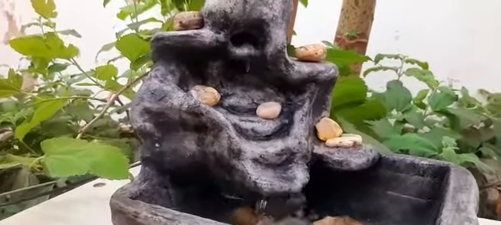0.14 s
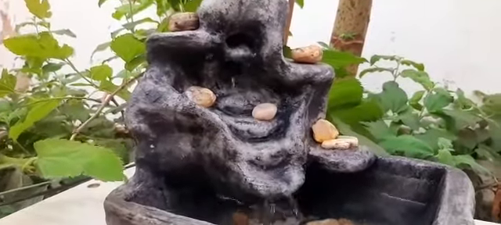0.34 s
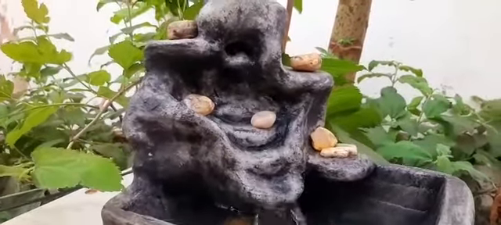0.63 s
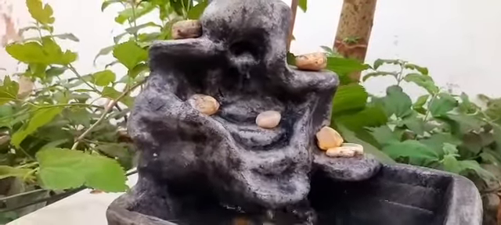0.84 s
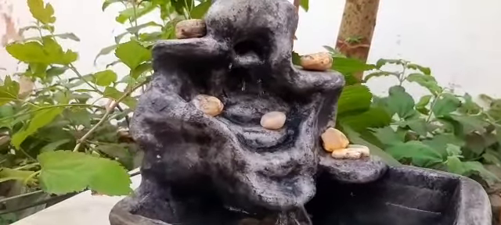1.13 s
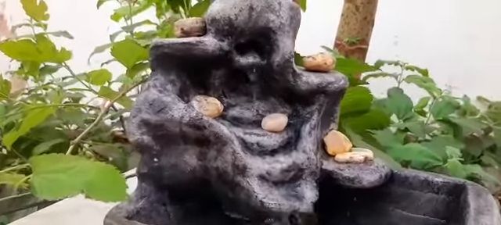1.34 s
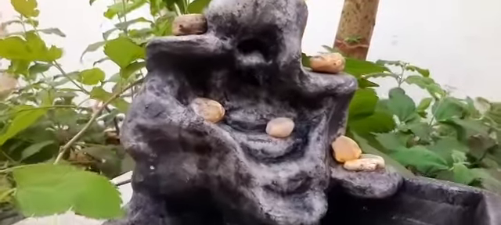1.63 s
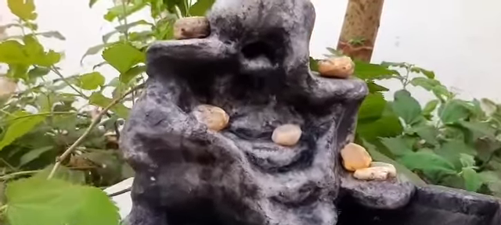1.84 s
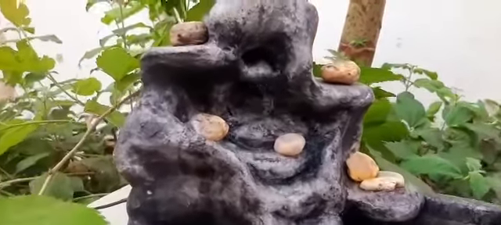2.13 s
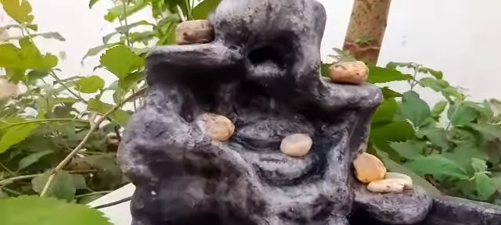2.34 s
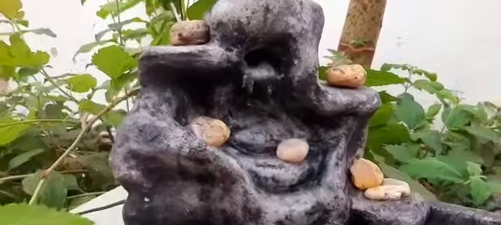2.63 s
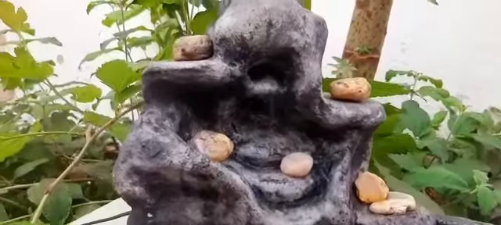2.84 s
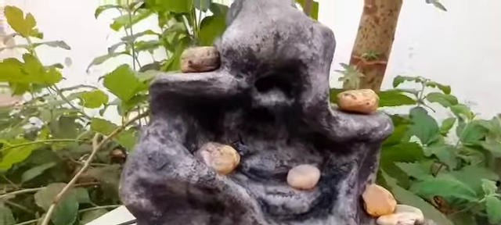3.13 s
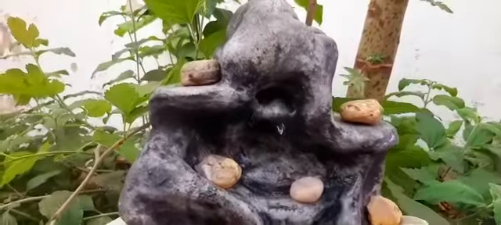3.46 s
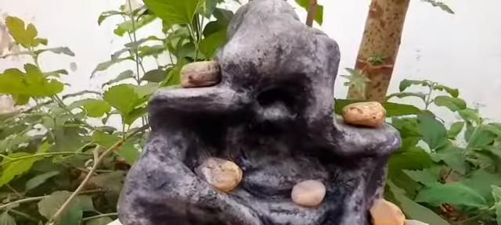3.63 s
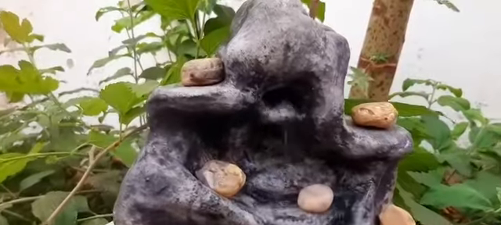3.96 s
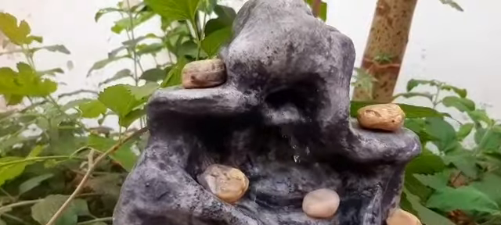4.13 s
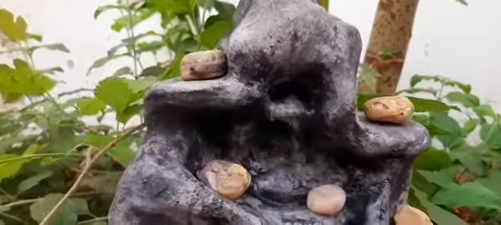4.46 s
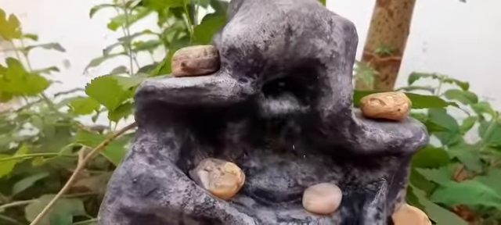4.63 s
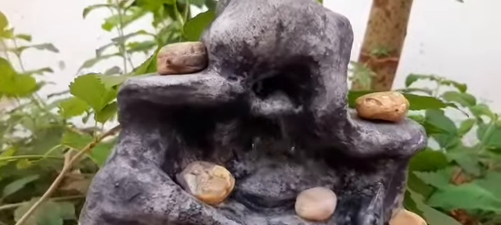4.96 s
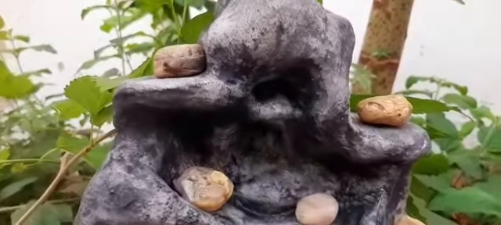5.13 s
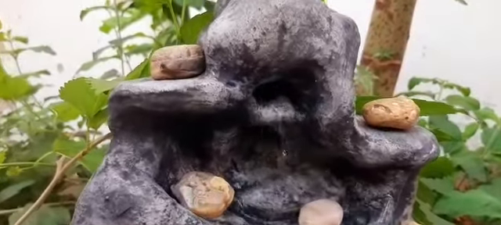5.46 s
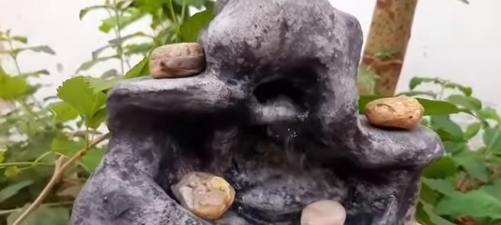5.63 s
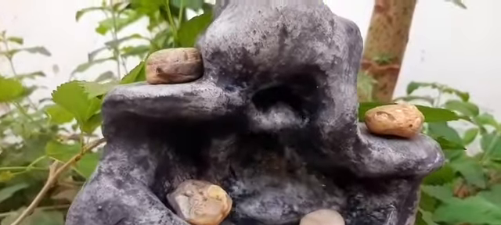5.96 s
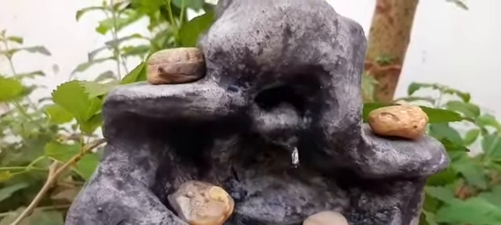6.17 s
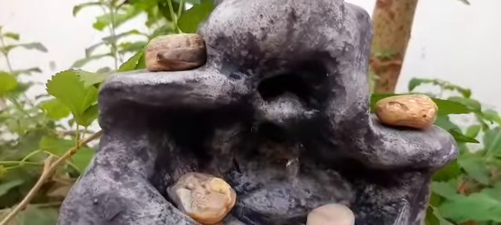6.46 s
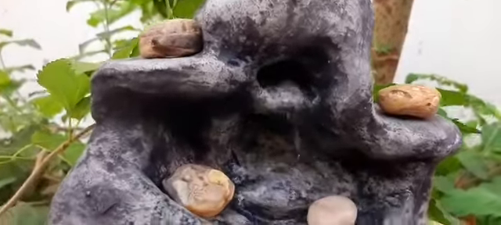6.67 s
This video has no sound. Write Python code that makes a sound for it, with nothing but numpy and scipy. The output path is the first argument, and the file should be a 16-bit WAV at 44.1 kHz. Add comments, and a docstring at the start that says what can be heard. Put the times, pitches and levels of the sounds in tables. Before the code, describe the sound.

Outdoors in a garden corner, a tiny fountain drips steadily but unevenly, each drop a short slap or a quick ringing blip, with faint spray between. Low road rumble and soft tyre roar bump up early, dip, then return. A faint narrow whine fades before three seconds, and motor hum pulses later. Close stereo microphone, bright water at right, shaded dull left, slight hiss and a short dry reflection.

```python
"""Traffic rumble, tyre roar and a fine trickle open the scene, and at once drops tick and ring in a garden corner.
A small stone fountain drips from tier to tier: noise puffs are the slaps, damped sines the trapped bubbles.
Behind it an engine slows to idle and a second motor's hum swells and fades, both stacks of wavering sines;
a narrow whine and a brief rustle are shaped noise, as are the rumble, roar and trickle.
The right microphone port faces the water; the left one is shaded and hears mostly bass."""
import sys
import numpy as np
from scipy import signal
from scipy.fft import rfft, irfft
from scipy.io import wavfile

SR = 44100
rng = np.random.default_rng(int(sys.argv[2]) if len(sys.argv) > 2 else 0)


def master_out(mix):
    """Clip the mix to full scale and print it as 16-bit PCM to the path in sys.argv[1]."""
    frames = np.transpose(np.atleast_2d(mix))
    ceiling = np.clip(frames, -1, 1)
    pcm = np.round(ceiling * 32767).astype(np.int16)
    wavfile.write(sys.argv[1], SR, pcm)


N = 299880
TIME = np.arange(N) / SR

# bubbles trapped by drops: (time [s], level [dB], settled pitch [Hz])
DROP_BUBBLES = [(0.0291, -42, 6250), (0.029, -43.5, 2100), (0.111, -36, 5800), (0.139, -40.5, 6300),
                (0.1867, -35.5, 5340), (0.189, -33, 3410), (0.2973, -40, 6380), (0.3458, -36, 1886),
                (0.3879, -38.5, 5600), (0.4015, -34, 3860), (0.417, -43.5, 6400), (0.517, -39, 6100),
                (0.562, -34, 5150), (0.7416, -40, 5580), (0.8015, -34, 1463), (0.805, -36.5, 4100),
                (1.0013, -38.5, 3860), (1.011, -40.5, 5250), (1.07, -32.5, 1755), (1.153, -40, 4000),
                (1.181, -36.5, 4150), (1.2438, -35.5, 2710), (1.5, -35, 6500), (1.618, -33, 3270),
                (1.686, -44, 2040), (1.7385, -31, 2640), (1.7413, -35.5, 3680), (1.768, -37, 5660),
                (1.803, -40.5, 6300), (1.8678, -43, 6000), (1.9649, -36, 6210), (2.1064, -39.5, 3280),
                (2.176, -28.5, 2970), (2.1765, -42.5, 6360), (2.219, -32, 3970), (2.256, -38.5, 2800),
                (2.3021, -28, 3200), (2.318, -47, 3600), (2.3925, -39, 7260), (2.4266, -30, 5500),
                (2.449, -42, 6440), (2.4918, -39, 1860), (2.5323, -44.5, 6600), (2.658, -44.5, 3180),
                (2.666, -45.5, 5660), (2.693, -47, 2430), (2.7284, -39, 3110), (2.792, -42, 6140),
                (2.8884, -38.5, 6470), (2.926, -44, 6200), (2.993, -45, 6350), (2.9913, -40, 4470),
                (3.0183, -33.5, 5660), (3.048, -43.5, 2860), (3.1808, -34, 1727), (3.2138, -40.5, 6800),
                (3.2132, -39, 5200), (3.239, -41, 2470), (3.503, -39, 3660), (3.5466, -32, 4440),
                (3.5505, -37, 3800), (3.549, -36.5, 6330), (3.6082, -29.5, 1703), (3.739, -37, 1576),
                (3.771, -35.5, 4340), (3.817, -44, 6700), (3.8358, -33, 6120), (3.849, -34, 2920),
                (3.869, -41.5, 2070), (3.999, -41, 3160), (4.014, -35.5, 6170), (4.04, -36, 5930),
                (4.17, -32.5, 1354), (4.218, -46, 3320), (4.2685, -36.5, 1535), (4.3724, -32.5, 5140),
                (4.5028, -35, 1522), (4.553, -40.5, 5300), (4.6156, -38.5, 5326), (4.632, -42, 4360),
                (4.67, -43.5, 2380), (4.8036, -40, 6280), (4.8161, -29.5, 1600), (4.8662, -37, 5750),
                (4.911, -37.5, 4430), (4.9474, -36, 3470), (4.947, -39, 1685), (4.962, -39, 5550),
                (4.974, -30.5, 4300), (5.063, -39.5, 6100), (5.0704, -42, 6400), (5.113, -45, 3540),
                (5.222, -46.5, 3200), (5.273, -35, 6210), (5.349, -42, 4540), (5.417, -35.5, 3150),
                (5.4173, -33, 6160), (5.483, -41, 5020), (5.544, -42, 6410), (5.555, -30, 5770),
                (5.555, -33.5, 7000), (5.574, -35.5, 1626), (5.596, -41.5, 5700), (5.649, -31, 4500),
                (5.647, -40.5, 6300), (5.689, -22, 2177), (5.771, -42.5, 3610), (5.7854, -38.5, 1630),
                (5.836, -35, 5850), (5.8473, -33.5, 3900), (5.872, -41, 6950), (5.882, -36, 1380),
                (5.9028, -32, 6180), (6.034, -43, 5900), (6.0405, -34.5, 5400), (6.252, -43.5, 2434),
                (6.265, -46, 6220), (6.3103, -34, 2600), (6.315, -29.5, 6780), (6.3295, -42, 6340),
                (6.474, -33, 2030), (6.485, -39, 7060), (6.556, -39.5, 4140), (6.602, -32.5, 2240),
                (6.614, -32.5, 5440), (6.6848, -30, 3620), (6.7253, -35, 3600), (6.725, -38.5, 6800),
                (6.7248, -27.5, 5270), (6.7654, -28.5, 3300), (6.783, -33, 2860), (6.7814, -32.5, 6480)]
# shading of far sound, left over right: (frequency [Hz], ratio [dB])
FAR_SHADE = [(30, -7), (90, 6.5), (450, -3.5), (900, -12), (2500, -27)]
# shading of the near water, left over right: (frequency [Hz], ratio [dB])
NEAR_SHADE = [(1900, -15), (2600, -21), (4300, -23), (5300, -38), (8000, -38), (11000, -32)]


def amp(db):
    """Turn dB into gain."""
    return 10 ** (np.asarray(db) / 20)


def rms_one(x):
    """Scale to rms 1."""
    return x / np.sqrt(np.mean(x ** 2) + 1e-20)


def in_time(rows):
    """Draw the columns of a time curve at every sample."""
    s, *columns = np.transpose(rows)
    return [np.interp(TIME, s, column) for column in columns]


def at_hz(points, hz):
    """Read a spectrum on a log frequency axis."""
    points = np.array(points)
    return np.interp(np.log(hz + 1), np.log(points[:, 0]), points[:, 1])


def colour(x, gain):
    """Filter by a gain given as a function of Hz."""
    return irfft(rfft(x) * gain(np.arange(N // 2 + 1) * SR / N), N)


def drift(rate):
    """Slow random wander of rms 1: noise through two equal poles at rate [Hz]."""
    step = 40   # samples between drawn points
    pole = np.exp(-2 * np.pi * rate * step / SR)
    noise = rng.standard_normal(N // step + 2002)
    slow = signal.lfilter([1], [1, -2 * pole, pole * pole], noise)[2000:]   # skip the run-in
    return np.interp(np.arange(N) / step, np.arange(len(slow)), rms_one(slow))


def sided(hz, side, shade=FAR_SHADE):
    """Response of one port (0 left and shaded, 1 right); the two average near 1."""
    turn_rad, turn_hz = 0.77, 398   # the shaded port's bass trails in phase, mostly below this pitch
    ratio = amp(at_hz(shade, hz))
    turn = np.exp(-1j * turn_rad * np.exp(-hz / turn_hz))
    return 2 * (ratio * turn if side == 0 else 1) / (1 + ratio)


def diffuse(spectrum, shade=FAR_SHADE):
    """Noise from all around, partly alike at both ports; the mean of the ports has rms 1."""
    # how alike the ports are: (frequency [Hz], left-right likeness [0-1])
    likeness = [(60, 0.9), (400, 0.65), (800, 0.39), (1500, 0.033)]
    shared, own = rng.standard_normal((2, N))

    def alike(hz):
        return np.clip(at_hz(likeness, hz), 0, 1)

    def shape(hz, side):
        inside = (hz > spectrum[0][0]) & (hz < spectrum[-1][0])
        return amp(at_hz(spectrum, hz)) * inside * sided(hz, side, shade)

    right = colour(shared, lambda hz: shape(hz, 1))
    left = colour(shared, lambda hz: shape(hz, 0) * alike(hz))
    left = left + colour(own, lambda hz: shape(hz, 0) * np.sqrt(1 - alike(hz) ** 2))
    return np.array([left, right]) / np.std((left + right) / 2)


def traffic():
    """Low rumble and tyre roar: two bands of diffuse noise with gently wavering levels."""
    # background swells: (time [s], rumble level [dB], tyre roar level [dB])
    swells = [(0, -56.5, -60.5), (.35, -51, -59), (.48, -40.5, -59), (.6, -46, -59.5), (.72, -40.5, -56),
              (.9, -48, -62.5), (2.5, -51, -69), (3.6, -48, -70.5), (4.6, -43.5, -65), (5.85, -40.5, -59.5),
              (6.8, -43.5, -64)]
    # rumble colour: (frequency [Hz], relative density [dB per Hz])
    rumble_colour = [(36, -11), (74, -7.5), (110, -7.5), (224, -13), (300, -14), (450, -24), (800, -33.5)]
    # tyre roar colour: (frequency [Hz], relative density [dB per Hz])
    roar_colour = [(300, 11.5), (500, 0.5), (970, 3.5), (1400, 1.5), (2110, -6.5), (2580, -16), (3200, -6)]
    deep_db, deep_db_per_s, upper_db = -3, 0.5, -5.5   # the deep half grows with time
    rumble_db, roar_db = in_time(swells)
    deep = amp(deep_db + deep_db_per_s * TIME) * diffuse(rumble_colour[:3])
    upper = amp(upper_db) * diffuse(rumble_colour[2:])
    rumble = amp(rumble_db + 0.94 * drift(11.0)) * (deep + upper)
    roar = amp(roar_db + 1.47 * drift(7.3)) * diffuse(roar_colour)
    return rumble + roar


def sheen():
    """Film of water on stone: noise that rises while drops come thick and sinks in the gaps."""
    # trickle colour: (frequency [Hz], relative density [dB per Hz])
    film_colour = [(1800, -7), (2620, -27), (3370, 14), (4820, 8), (6400, 2.5), (7500, 5), (8550, -33),
                   (12300, -1.5), (15500, -12), (17000, 24)]
    level_db, high_db = -73.5, 8.5   # the film as a whole; its upper half over its lower
    stir_s, swing_db = 0.02, 3   # decay of the stir before its square root; rms swing in level
    low, high = diffuse(film_colour[:7], NEAR_SHADE), diffuse(film_colour[6:], NEAR_SHADE)
    drops = np.zeros(N)
    drops[(np.array(DROP_BUBBLES)[:, 0] * SR).astype(int)] = 1
    stir = np.sqrt(signal.lfilter([1], [1, -np.exp(-1 / (stir_s * SR))], drops))
    stir_db = swing_db * rms_one(stir - stir.mean())
    # the two halves flicker on their own
    low_flicker_db, high_flicker_db = 2.5 * drift(15), 1.5 * drift(15)
    film = amp(low_flicker_db) * low + amp(high_db + high_flicker_db) * high
    return amp(level_db + stir_db) * film


def motors():
    """Multiples of two firing rates as wavering sines: an engine slowing to idle and a second motor."""
    # engine swells: (time [s], level [dB])
    engine_swells = [(0, -65), (.45, -57.5), (.75, -46.5), (1.75, -44.5), (2.2, -53.5), (2.95, -46.5),
                     (3.55, -58.5), (3.9, -44.5), (4.4, -83), (5.0, -48), (5.35, -81), (5.65, -42.5),
                     (6.2, -43.5), (6.8, -73)]
    # what the engine's pipe lets out: (frequency [Hz], gain [dB])
    pipe = [(56, -4), (68, -6.5), (85, 3.5), (105, -5.5), (130, -8.5), (146, 1)]
    # second motor's pace: (time [s], rate [Hz])
    hum_pace = [(0, 47.02), (3.3, 47.58), (4.5, 48.92), (5.7, 48.98), (6.3, 47.85), (6.8, 48.36)]
    # second motor's swells: (time [s], level of its loud second multiple [dB])
    hum_swells = [(0, -109), (2.0, -46.5), (2.5, -54), (3.15, -39), (3.55, -56), (3.8, -44), (4.05, -53.5),
                  (4.4, -32.5), (4.6, -31), (4.85, -48), (5.0, -41.5), (5.2, -55.5), (5.58, -28),
                  (6.0, -28), (6.45, -42.5), (6.6, -39.5), (6.8, -27.5)]
    # its steadier overtones: (multiple of the rate, level at the start [dB])
    overtones = [(4, -72), (6, -72)]
    start_hz, slowing_hz_per_s, idle_hz = 37.56, 2.95, 29.44   # engine firing rate
    nearing_db_per_s = 2   # the overtones grow as the second motor nears

    rate = np.maximum(start_hz - slowing_hz_per_s * TIME, idle_hz)
    turn = 2 * np.pi * np.cumsum(rate) / SR
    engine_db, = in_time(engine_swells)
    engine = 0
    for k in range(2, 5):
        level_db = engine_db + at_hz(pipe, k * rate) + 3.3 * drift(4)
        engine = engine + amp(level_db) * np.sin(k * turn + 0.5 * drift(5))

    hum_hz, = in_time(hum_pace)
    hum_db, = in_time(hum_swells)
    spin = 2 * np.pi * np.cumsum(hum_hz) / SR + 0.091 * drift(2.05)
    hum = amp(hum_db) * np.sin(2 * spin)
    for k, db in overtones:
        hum += amp(nearing_db_per_s * TIME + db + 2.2 * drift(2.5)) * np.sin(round(k) * spin)
    both = np.sqrt(2) * (engine + hum)   # makes the levels rms
    return np.array([colour(both, lambda hz: sided(hz, side)) for side in (0, 1)])


def whine():
    """A narrow band of noise rides a pitch that falls, then lifts as it fades."""
    # whine path: (time [s], centre pitch [Hz], level before a 1 dB trim [dB])
    path = [(0, 1379, -68.5), (2.2, 1305, -64.5), (2.8, 1340, -102)]
    hz, db = in_time(path)
    turn = 2 * np.pi * np.cumsum(hz) / SR
    band = drift(60) * np.cos(turn) + drift(60) * np.sin(turn)
    return amp(db - 1) * band * amp([[-5], [0]])   # left port 5 dB down


def add_bubble(out, s, db, hz, sag=0.03, ring_db=-2.0, early_s=0.008):
    """A damped sine swells over four cycles, starts a little sharp and settles as it rings out."""
    t60 = 50.0 / hz   # rings 50 cycles until 60 dB down
    t = np.arange(int(t60 * SR)) / SR
    swell = np.sin(np.pi / 2 * np.minimum(t * hz / 4, 1)) ** 2
    early = (hz / 6000) ** 2 * amp(-60 * t / early_s)   # small, high bubbles shed much energy at once
    fade = early + amp(ring_db - 60 * t / t60)
    pitch = hz * (1 + sag * np.exp(-6.0 * t / t60))
    wave = np.sin(2 * np.pi * np.cumsum(pitch) / SR) * amp(db) * fade * swell
    i = int(s * SR)
    out[i:i + len(t)] += wave[:N - i]


def bubbles():
    """Loud bubbles, each roughened by two close twins, amid a random scatter of small ones."""
    clump_s = 0.056   # small ones fall from one clump before a loud bubble to two after
    out = np.zeros(N)
    luck = rng.standard_normal((len(DROP_BUBBLES), 2, 3))
    for (s, db, hz), twins in zip(DROP_BUBBLES, luck):
        add_bubble(out, s, db, hz)
        for late, size, pitch in twins:
            # large, low bubbles have fainter twins and ring cleaner
            twin_db = db - 7 + 5.0 * np.log2(hz / 6000) + 2.5 * size
            add_bubble(out, s + 0.0035 * abs(late), twin_db, hz * np.exp(.1 * pitch))
    for which, when, size, pitch in rng.random((420, 4)):
        loud_s = DROP_BUBBLES[int(which * len(DROP_BUBBLES))][0]
        s = np.clip(loud_s + clump_s * (3 * when - 1), 0, N / SR)
        add_bubble(out, s, -60 - 3.0 * np.log(1 - .96 * size), 1500 * 5.0 ** pitch ** .8)
    return out


def ticks():
    """Each slap is a noise puff a few milliseconds long, duller or brighter by chance, amid bursts of spray."""
    # drops slapping the surface: (time [s], level [dB])
    slaps = [(0.5169, -33.5), (0.7454, -45), (1.0405, -42), (1.1288, -41), (1.2446, -30.5), (1.418, -53),
             (1.427, -49), (1.5708, -36.5), (1.7963, -58), (1.8435, -49), (1.936, -44.5), (1.9894, -41),
             (2.0097, -47), (2.176, -45), (2.2014, -39), (2.2328, -42), (2.2762, -47), (2.592, -33),
             (2.6878, -47), (2.787, -42), (2.8303, -40), (3.0475, -44), (3.0623, -31.5), (3.1448, -53),
             (3.2545, -52), (3.268, -44.5), (3.6155, -34), (3.6644, -39.5), (3.7651, -45), (3.9469, -46),
             (3.9742, -43), (4.0029, -41.5), (4.0122, -43), (4.1939, -39), (4.206, -46), (4.2273, -39),
             (4.3725, -38), (4.551, -29.5), (4.5974, -38), (4.8112, -39), (5.0398, -38), (5.0884, -32.5),
             (5.5542, -39), (5.5882, -40), (5.6759, -33.5), (5.9258, -40), (6.1744, -46), (6.2994, -42),
             (6.316, -30), (6.344, -47), (6.3772, -44), (6.7246, -50)]
    # colour of all slaps: (frequency [Hz], gain [dB])
    slap_colour = [(1000, 1.5), (2500, -5.5), (6500, 6), (8700, -6), (11500, 3), (15000, 5)]
    slap_tilt_db, spray_tilt_db, plunge_tilt_db = 10, 4, -3   # brightness per octave; plunges trap a bubble
    tilt_spread_db = 4   # scatter of the brightness per octave

    spray_per_s = 125.0 * amp(2.0 * drift(8))
    spray_db = -63 + 3.3 * np.minimum(rng.exponential(1, N), 3)
    hits = (rng.random(N) < spray_per_s / SR) * amp(spray_db)
    spread_db = np.full(N, 4.5)   # chance level of each band
    tilt_db = np.full(N, float(spray_tilt_db))
    for s, db, hz in DROP_BUBBLES:   # the drop that traps a bubble slaps the surface first
        i = int(s * SR)
        hits[i], tilt_db[i] = amp(db - 16.5), plunge_tilt_db
    for s, db in slaps:
        i = int(s * SR)
        hits[i], spread_db[i], tilt_db[i] = amp(db), 2.5, slap_tilt_db
    tilt_db += tilt_spread_db * rng.uniform(-0.87, 1, N)

    spectrum, hit = 0, np.flatnonzero(hits)
    hz = np.arange(N // 2 + 1) * SR / N
    for centre_hz in np.geomspace(2000, 15500, 8):
        band_db = rng.standard_normal(len(hit)) * spread_db[hit]
        band_db = band_db + tilt_db[hit] * np.log2(centre_hz / 12000)
        shares = np.zeros(N)
        shares[hit] = hits[hit] * amp(band_db)
        fast, slow = (signal.lfilter([1], [1, -np.exp(-1 / (tau_s * SR))], shares + 1e-18)
                      for tau_s in (.0006, .003))
        # the slap takes a moment to build
        puff = signal.lfilter([.08], [1, -.92], fast + amp(-11.0) * slow)
        band = np.exp(-(np.log((hz + 1) / centre_hz) / .21) ** 2)
        spectrum = spectrum + rfft(puff * rng.standard_normal(N)) * band
    return irfft(spectrum * amp(at_hz(slap_colour, hz)), N)


def corner(x, t60=0.12, gap_s=0.0005, dull_hz=7000):
    """Basin and garden wall answer with a short, dull diffuse tail, another at each port."""
    t = np.arange(int(.25 * SR)) / SR
    tail = rng.standard_normal((2, len(t))) * amp(-60 * t / t60) * (t > gap_s)
    tail = signal.lfilter(*signal.butter(1, dull_hz, fs=SR), tail)
    return signal.fftconvolve(x[None], rms_one(tail) / np.sqrt(len(t)), axes=1)[:, :N]


def water():
    """Drops as the two ports hear them; the shaded port hears the tail about as strongly as the drops
    themselves."""
    drops = bubbles() + ticks()
    tail = corner(drops)
    left = colour(amp(-4) * (drops + tail[0]), lambda hz: sided(hz, 0, NEAR_SHADE))
    right = colour(drops + amp(-15.5) * tail[1], lambda hz: sided(hz, 1, NEAR_SHADE))
    return np.array([left, right])


def rustle():
    """A short scratchy noise whose lower and upper halves crackle on their own."""
    # rustle swell: (time [s], level before a 2.5 dB lift [dB])
    swell = [(1.03, -76), (1.1, -60), (1.17, -71), (1.228, -56.5), (1.236, -54), (1.28, -50),
             (1.305, -58.5), (1.36, -75)]
    # rustle colour: (frequency [Hz], relative density [dB per Hz])
    scratch_colour = [(500, -43), (1400, 2.0), (4000, 1), (7000, -7), (8700, -25), (12000, -10),
                      (16000, -21)]
    noise = diffuse(scratch_colour, NEAR_SHADE)
    low = signal.lfilter(*signal.butter(2, 3000, fs=SR), noise)
    low_crackle_db, high_crackle_db = 3.5 * drift(120), 3.0 * drift(120)
    both = amp(low_crackle_db) * low + amp(high_crackle_db) * (noise - low)
    sounding = np.abs(TIME - 1.2) < .17
    return amp(in_time(swell)[0] + 2.5) * both * sounding


def scene():
    """Water in front, traffic and motors behind."""
    return traffic() + sheen() + motors() + whine() + water() + rustle()


def record(dry):
    """Each port adds its own hiss and loses the deepest bass; the top is cut."""
    # self-noise of each port: (frequency [Hz], relative density [dB per Hz])
    hiss_colour = [(700, 9), (2000, 2.5), (4500, -4), (8500, -12), (11500, -2.5), (15500, -1.5)]
    hiss_db, bass_cut_hz, top_cut_hz = -74, 42.0, 16300
    hiss = [rms_one(colour(rng.standard_normal(N), lambda hz: amp(at_hz(hiss_colour, hz)) * (hz > 500)))
            for port in dry]
    noisy = dry + amp(hiss_db) * np.array(hiss)
    lean = signal.sosfilt(signal.butter(3, bass_cut_hz, "high", fs=SR, output="sos"), noisy)
    return signal.sosfilt(signal.cheby2(12, 40, top_cut_hz, fs=SR, output="sos"), lean)


dry = scene()
out = record(dry)
master_out(out)
```